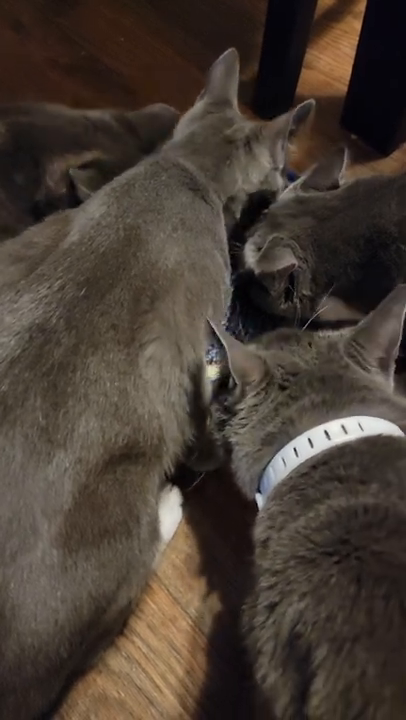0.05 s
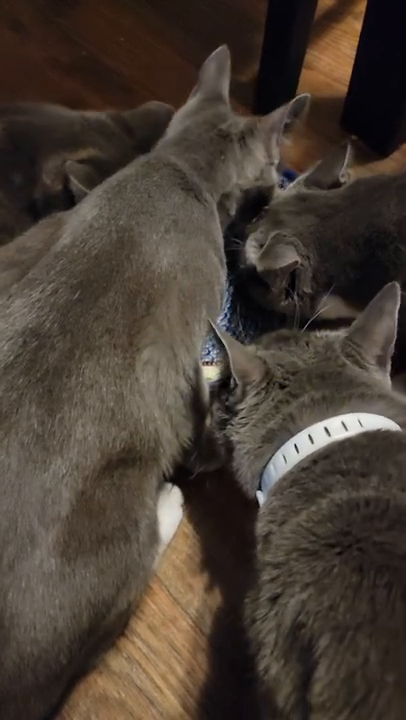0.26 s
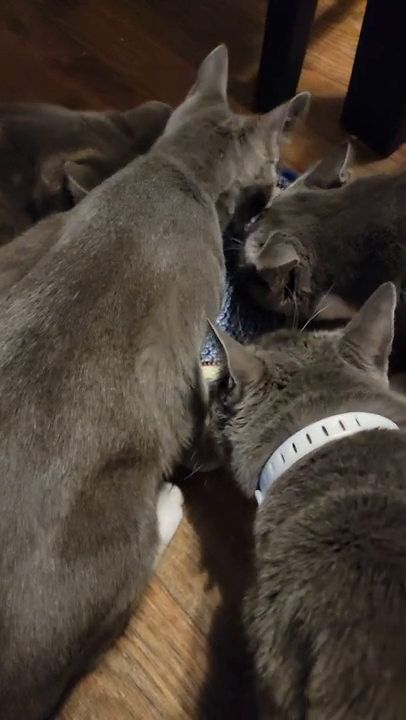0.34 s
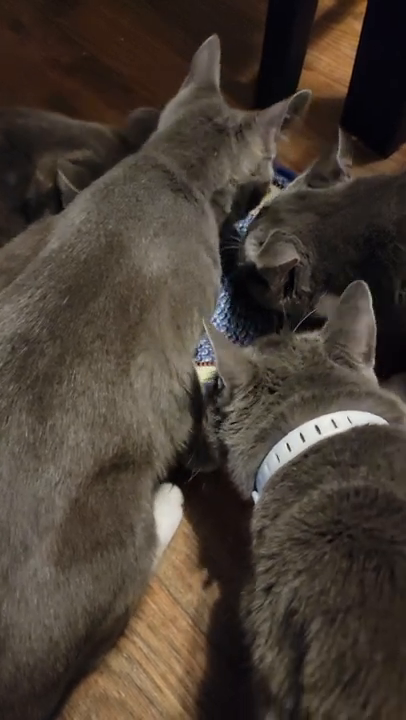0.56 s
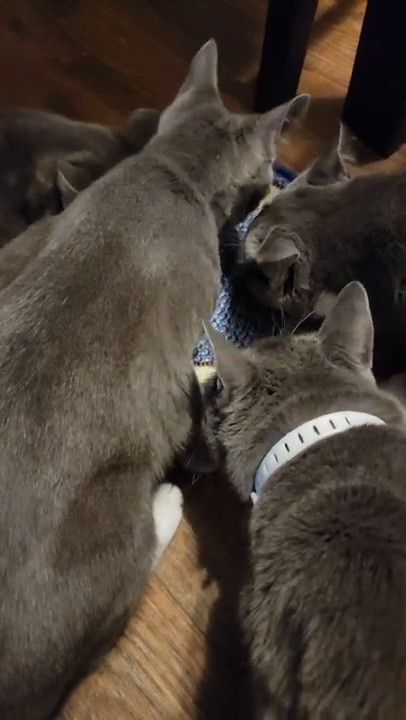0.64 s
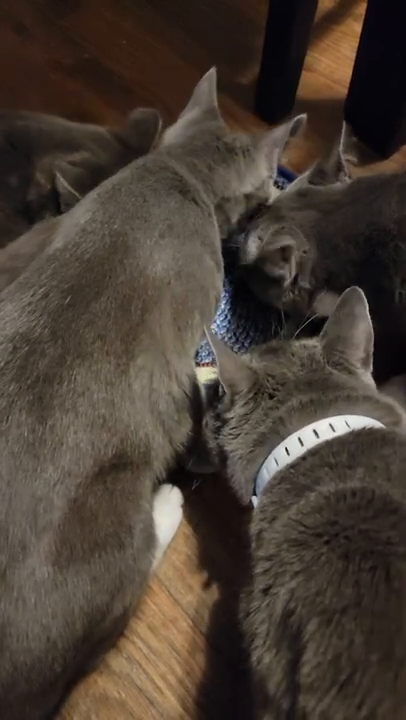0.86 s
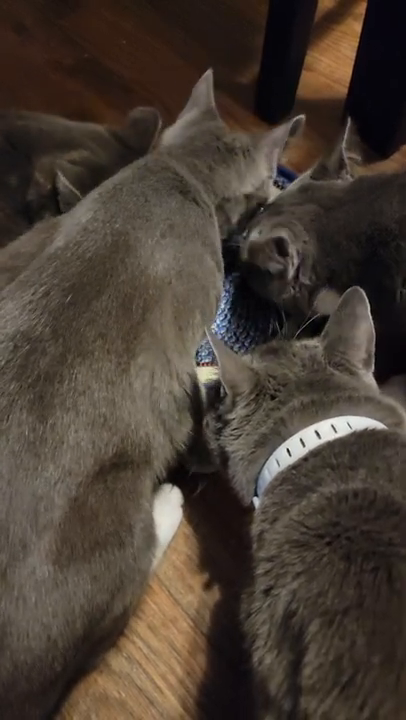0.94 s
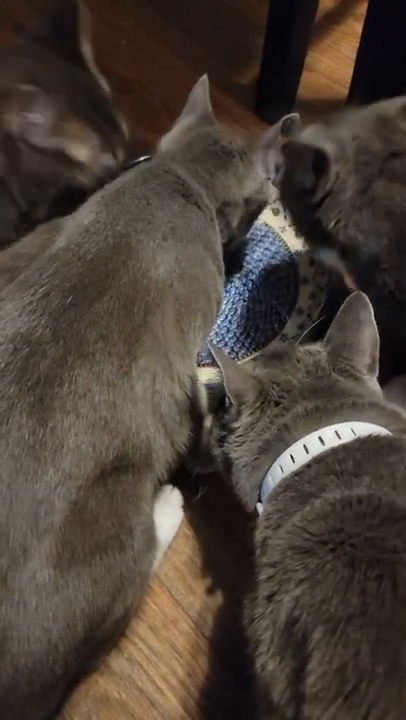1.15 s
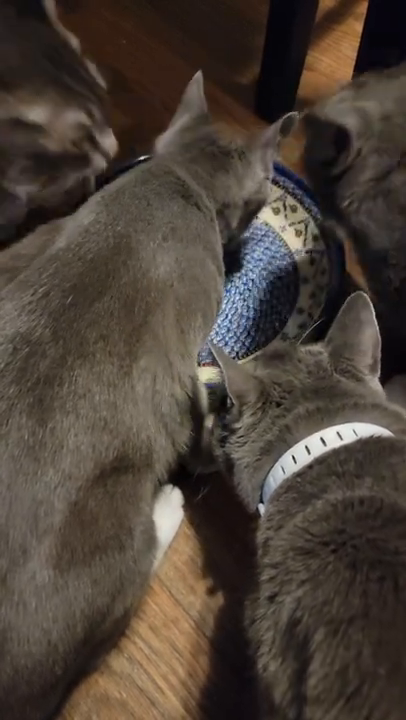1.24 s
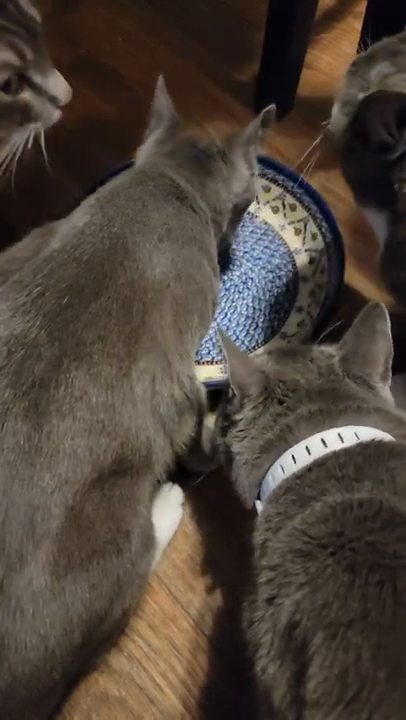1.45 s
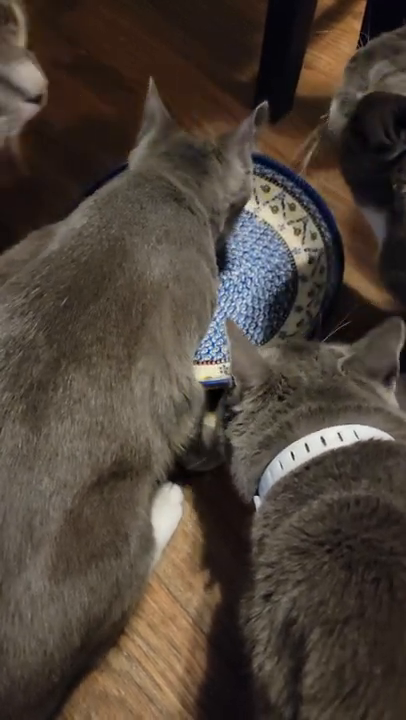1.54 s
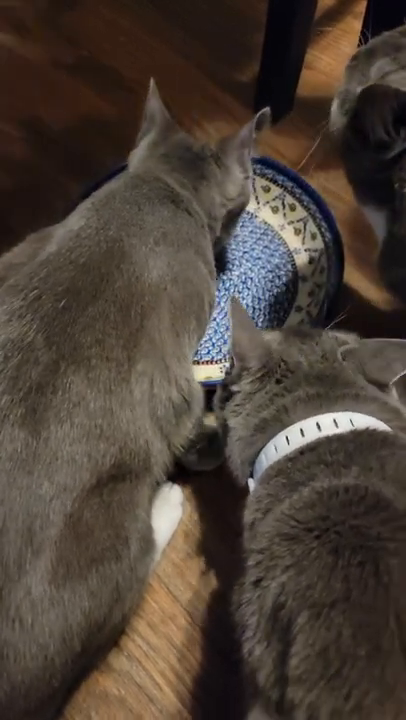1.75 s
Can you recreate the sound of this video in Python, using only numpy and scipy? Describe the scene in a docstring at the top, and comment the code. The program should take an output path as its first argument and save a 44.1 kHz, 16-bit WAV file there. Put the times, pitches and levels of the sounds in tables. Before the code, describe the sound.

A ceramic dish knocks and rocks faster and faster on a wooden floor, then settles.

```python
"""A small room with a wooden floor, an appliance humming, a stereo microphone near a ceramic dish.
Cats crowd round the dish and tip it: its rim knocks a few times, then it rocks faster and faster.
Each knock rings the dish, clacks on the boards and sounds the pocket of air underneath, which drops
in pitch as the gap closes; the room echoes the ringing. The dish settles, leaving faint chewing
over the hum."""
import sys
import numpy as np
from scipy import signal
from scipy.fft import rfft, irfft
from scipy.io import wavfile
from scipy.ndimage import uniform_filter1d

SR = 44100
rng = np.random.default_rng(int(sys.argv[2]) if len(sys.argv) > 2 else 0)


def to_wav(s):
    """Save 16-bit WAV."""
    ch = np.atleast_2d(s).T  # columns
    pcm = np.round(np.clip(ch, -1, 1) * 32767)  # PCM
    wavfile.write(sys.argv[1], SR, pcm.astype(np.int16))


N = 79380
RING_SAMPLES = 20480  # length of one knock or chew

# Knocks of the rim on the floor:
# start_s, ring_db, overtones_over_ring_db, air_pitch_hz, air_db, clack_db, treble_db_per_octave
KNOCKS = [ (-.025, -11.5, 9.5, 863, -8, -13, 4.5), (.066, -15, -8.5, 832, -17.5, -43, 5),
          (.082, -28.5, -12, 885, -18.5, -36, -4), (.2445, -5.5, 5, 872, 4.5, -1.5, 0),
          (.294, -31, 4, 878, -21.5, -19, -16), (.4020, -4.5, 7, 847.4, 0, -3, -1.5),
          (.456, -16, 15, 851, -7.5, -7, -15), (.490, -16, 2, 833, -6.5, -26.5, -13.5),
          (.5385, -12.5, 10, 857, -4.5, -9, -16), (.566, -27.5, 3, 829, -16, -30, -16),
          (.5965, -7.5, 2, 830, -4, -8.5, -12), (.620, -24.5, 2, 797.6, -3.5, -31, -8.5),
          (0.718, -1.5, 3, 788.8, 2, -3, -3.5), (0.822, -1.5, 1, 782.5, 5, 0, -1),
          (0.9131, -1.5, 6, 750.4, 1.5, 3, 0.5), (.9920, 0.5, 6.5, 734, 0.5, 0.5, 2),
          (1.0575, -3, -7, 672, -3, 2, 0), (1.109, -7, 0, 628, -9, -1.5, -1),
          (1.145, -11.5, -1, 540, -15, -9.5, -0.5), ]


def amp(db):
    """Decibels to gain."""
    return 10 ** (np.asarray(db) / 20)


def along(points, hz):
    """Read (frequency_hz, value) points on a log-frequency axis."""
    point_hz, values = np.array(points, float).T
    return np.interp(np.log(hz + 1), np.log(point_hz + 1), values)


def noise(colour, size=N):
    """Stereo noise of rms 1 in the given colour, centred in the bass and wide in the midrange."""
    # Correlation of left and right: frequency_hz, likeness (-1 to 1)
    stereo_likeness = [(60, .94), (130, .88), (290, .55), (640, -.35), (1410, -.75), (3100, -.25),
                       (5000, .1), (15000, -.05)]
    hz = np.arange(size // 2 + 1) * SR / size
    likeness = along(stereo_likeness, hz)
    spectra = rfft(rng.standard_normal((2, size))) * amp(along(colour, hz))
    mid, side = spectra * np.sqrt([1 + likeness, 1 - likeness])
    stereo = irfft([mid + side, mid - side], size)
    return stereo / stereo.std()


def fade(t, t60_s):
    """Exponential decay, 60 dB down at t60_s."""
    return np.exp(-np.log(1000) * t / t60_s)


def place(tone, pan_db, lead_rad):
    """A complex tone at the microphone pair: the left is louder by pan_db and ahead by lead_rad."""
    left = tone * amp(pan_db / 2) * np.exp(.5j * lead_rad)
    right = tone * amp(-pan_db / 2) * np.exp(-.5j * lead_rad)
    return np.imag([left, right])


def add(out, sound, start_s):
    """Mix sound into out from start_s, dropping what falls outside."""
    i = int(round(start_s * SR))
    sound = sound[:, max(-i, 0):N - i]
    out[:, max(i, 0):max(i, 0) + sound.shape[1]] += sound


def appliance():
    """Room tone: wavering motor and fan tones over a soft rush of air."""
    # Steady rush of air: frequency_hz, density_db
    rush_colour = [(20, -12.5), (38, -14.5), (58, -3), (95, -3), (135, 1), (180, -5), (280, -4.5),
                   (400, -2), (520, -4.5), (800, -2.5), (1100, -5.5), (1350, 1.5), (1600, -13.5),
                   (2200, -16), (3000, -27.5), (5000, -30.5), (6400, -27), (7600, -33), (10500, -40.5),
                   (13000, -34), (15500, -37.5)]
    # Motor and fan tones: pitch_hz, level_db, pan_db, lead_rad, unsteadiness (0 to 1)
    hum_tones = [(67.5, -64.5, -4, 0, 0.6), (117.7, -75, -7.5, 3, 0), (328.7, -59.5, -10.5, 0.71, 0.5),
                 (358.8, -64, -8, 0.1, 0.3), (711, -70, -14.5, 2, 0.8), (1316, -57, 7, 4, 0.5),
                 (1995, -78, -12.5, 11, 0.9)]
    # Swell and fall of the highest tones: time_s, gain_db
    whine_curve = [(0, 0.5), (.2, 4), (1.4, 4.5), (1.56, -3.5), (1.8, -5)]
    waver_hz, whine_from_hz = 7.8, 900
    t, span = np.arange(N) / SR, int(SR / waver_hz)
    out = amp(-53.5) * noise(rush_colour) * amp([[-.5], [.5]])  # slightly to the right
    for hz, db, pan_db, lead_rad, unsteadiness in hum_tones:
        drift = uniform_filter1d(rng.standard_normal((2, N)), span, mode="wrap")
        drift = uniform_filter1d(drift, span // 2, mode="wrap")
        steady = np.sqrt(2 * (1 - unsteadiness ** 2))
        waver = steady + unsteadiness * (drift[0] + 1j * drift[1]) / drift.std()
        if hz > whine_from_hz:
            waver *= amp(np.interp(t, *np.array(whine_curve).T))
        out += place(amp(db) * waver * np.exp(2j * np.pi * hz * t), pan_db, lead_rad)
    return out


def room(direct):
    """The direct sound reaches the microphones first, then close reflections and a short diffuse tail."""
    # Reflections off nearby surfaces: delay_s, left_db, right_db
    echoes = [(.0045, -11, -13), (.0108, -5.5, -12.5), (.0172, -10.5, -7), (.0290, -15.5, -23)]
    out, t = direct.copy(), np.arange(SR // 2) / SR
    for delay_s, left_db, right_db in echoes:
        add(out, direct * amp([[left_db], [right_db]]), delay_s)
    tail = noise([(20, 0), (20000, 0)])[:, :len(t)] * fade(t, t60_s=.23)
    tail *= amp(-7) / np.sqrt(np.sum(tail ** 2) / 2)  # 7 dB under the direct sound
    add(out, signal.fftconvolve(direct[:1], tail, axes=1), start_s=.008)
    return out


def chewing():
    """Cats' mouths at the food make faint, bright ticks."""
    # Single bites: start_s, level_db
    chews = [(.20, -69), (.645, -63.5), (1.338, -63), (1.455, -63), (1.597, -61.5), (1.741, -66)]
    # Spectrum of a bite: frequency_hz, density_db
    chew_colour = [(500, -7), (2500, 5), (6500, 0), (9000, 0), (11000, -16), (15500, 3)]
    out, t = np.zeros((2, N)), np.arange(RING_SAMPLES) / SR
    for start_s, db in chews:
        add(out, amp(db) * noise(chew_colour, len(t)) * fade(t, t60_s=.07), start_s)
    return out


def rolling():
    """Between knocks the tilted rim grinds along the wood and keeps the dish murmuring."""
    # Strength of the grinding: time_s, level_db
    roll_curve = [(0, -54.5), (0.121, -43), (.19, -52), (0.238, -41), (.33, -47), (.44, -33), (.53, -38),
                  (.64, -37.5), (0.698, -41), (.85, -38), (1.0, -31.5), (1.15, -32.5), (1.201, -41.5),
                  (1.3, -69)]
    # Spectrum of the grinding: frequency_hz, density_db
    roll_colour = [(100, -39.5), (420, -18.5), (565, -7.5), (640, -6.5), (830, 1.5), (960, 5.5),
                   (1120, -26), (1450, -4.5), (1700, -25.5), (3000, -35), (8000, -67.5)]
    return noise(roll_colour) * amp(np.interp(np.arange(N) / SR, *np.array(roll_curve).T))


def boards():
    """Rim on wood: a tick, a dense clack and a quick rebound; harder contacts are brighter."""
    # Spectrum of the rim striking the boards: frequency_hz, density_db
    clack_colour = [(150, -23.5), (380, -13.5), (520, -6), (720, 6), (950, 6.5), (1120, -14.5), (1400, 8),
                    (1620, -9.5), (2000, -6.5), (2800, -9.5), (3850, -17), (4450, -17), (4900, -28.5),
                    (5900, -28), (7400, -38.5), (8300, -36.5), (9800, -56.5), (15500, -49.5)]
    common_share, bright_from_hz = .84, 2370  # that share of the noise power is alike in every knock
    rise_s, rebound_s, rebound_db = .0016, .0085, -6
    out, t = np.zeros((2, N)), np.arange(RING_SAMPLES) / SR
    common = noise(clack_colour, len(t))
    fft_size = 2 * len(t)
    hz = np.arange(fft_size // 2 + 1) * SR / fft_size
    treble_octaves = np.log2(np.clip(hz / bright_from_hz, 1, 4))
    tick = amp(-8.5) * fade(t, t60_s=.058)
    envelope = fade(t, t60_s=.25) * (1 - np.exp(-t / rise_s)) + tick
    for start_s, *_, clack_db, treble_db in KNOCKS:
        contact = np.sqrt(common_share) * common + np.sqrt(1 - common_share) * noise(clack_colour, len(t))
        spectrum = rfft(contact * envelope, fft_size) * amp(treble_db * treble_octaves)
        clack = amp(clack_db - 28.5) * irfft(spectrum)[:len(t)]
        add(out, clack, start_s)
        add(out, amp(rebound_db) * clack, start_s + rebound_s)
    return out


def air_pocket(t, pitch_hz):
    """The air under the dish sounds two resonances that sink as the gap closes."""
    sag_per_s, second_ratio = .81, .92
    phase = 2 * np.pi * pitch_hz * np.cumsum(np.exp(-sag_per_s * t)) / SR
    first = fade(t, t60_s=.061) * np.exp(1j * phase)
    second = amp(-12.5) * fade(t, t60_s=.12) * np.exp(1j * phase * second_ratio)
    return place(first + second, pan_db=0, lead_rad=1.64)


def ring(modes, t, scatter_db=3):
    """Struck ceramic rings in decaying modes, each a little different in strength at every blow."""
    out = np.zeros((2, len(t)))
    for hz, db, t60_s, pan_db, lead_rad in modes:
        strength = amp(db + scatter_db * rng.standard_normal())
        out += place(strength * fade(t, t60_s) * np.exp(2j * np.pi * hz * t), pan_db, lead_rad)
    return out


def dish():
    """Every knock rings the ceramic and the air beneath it; the ringing carries no deep bass."""
    # Lowest modes of the dish: pitch_hz, level_db, t60_s, pan_db, lead_rad
    low_modes = [(551, -37.5, 0.065, 0, 3.1), (940.3, -21.5, 0.22, 3, 2.12), (996.6, -30, 0.21, -12, 2.8)]
    # Its overtones: pitch_hz, level_db, t60_s, pan_db, lead_rad
    overtones = [(1254, -44, 0.11, -2.5, 0.73), (1364, -45, .28, -5, 3), (1460.7, -23.5, .18, 0, 2.83)]
    # High modes that a hard contact brings out: pitch_hz, level_db, t60_s, pan_db, lead_rad
    high_modes = [(1753, -41.5, 0.061, 14, 1.7), (2110, -38, 0.11, 10.5, 0.93), (2630, -43, 0.15, 4.5, 6),
                  (2784, -51, 0.18, -4, 3.1), (3200, -49, 0.24, -4.5, 5.5), (3710, -57, 0.083, -3, 3.0),
                  (4172, -44, 0.037, -9, 1.2), (5950, -61.5, 0.091, 5.5, 2.1)]
    build_s, low_cut_hz = .0035, 442
    out, t = np.zeros((2, N)), np.arange(RING_SAMPLES) / SR
    build = 1 - np.exp(-t / build_s)
    release = np.minimum(2 * (1 - t / t[-1]), 1)
    for start_s, ring_db, overtones_db, air_hz, air_db, clack_db, treble_db in KNOCKS:
        air = amp(air_db - 12.5) * air_pocket(t, air_hz)
        body = amp(ring_db) * (ring(low_modes, t) + amp(overtones_db) * ring(overtones, t))
        clink = amp(clack_db + treble_db) * ring(high_modes, t)
        add(out, (body + clink + air) * build * release, start_s)
    return signal.sosfilt(signal.butter(2, low_cut_hz, "high", fs=SR, output="sos"), out)


def scene():
    """The rocking dish and the eating cats in the humming room."""
    return appliance() + room(dish()) + boards() + rolling() + chewing()


def record(dry):
    """The sound fades in over 3 ms, and the highest treble is cut."""
    fade_in_s, top_hz = .003, 15750
    fade_in = np.minimum(np.arange(N) / SR / fade_in_s, 1)
    return signal.sosfilt(signal.ellip(10, .2, 80, top_hz, fs=SR, output="sos"), dry * fade_in)


dry = scene()
out = record(dry)
to_wav(out)
```